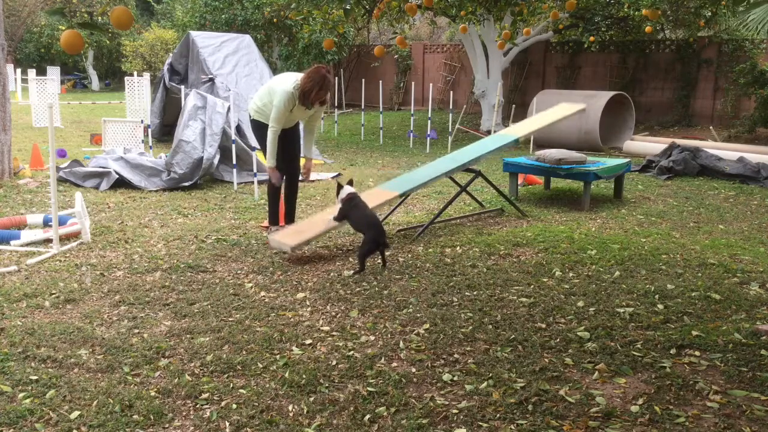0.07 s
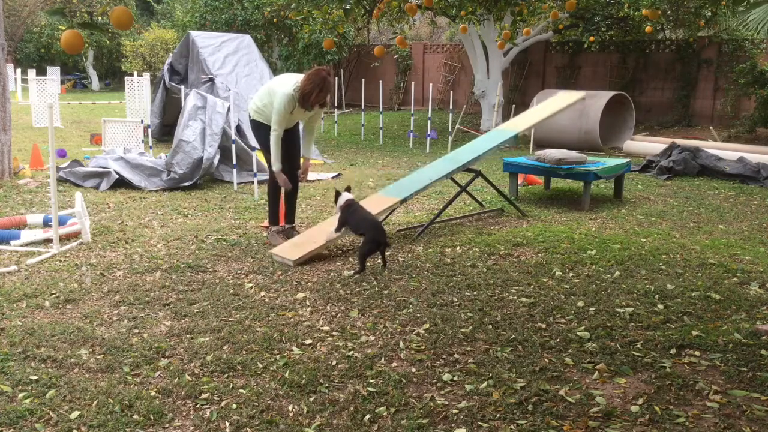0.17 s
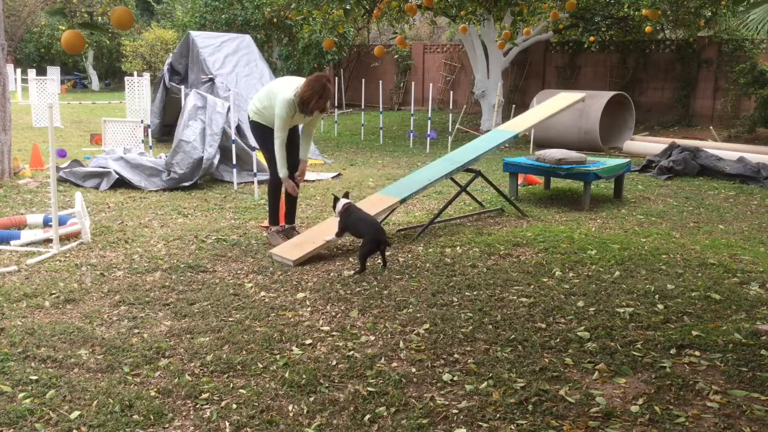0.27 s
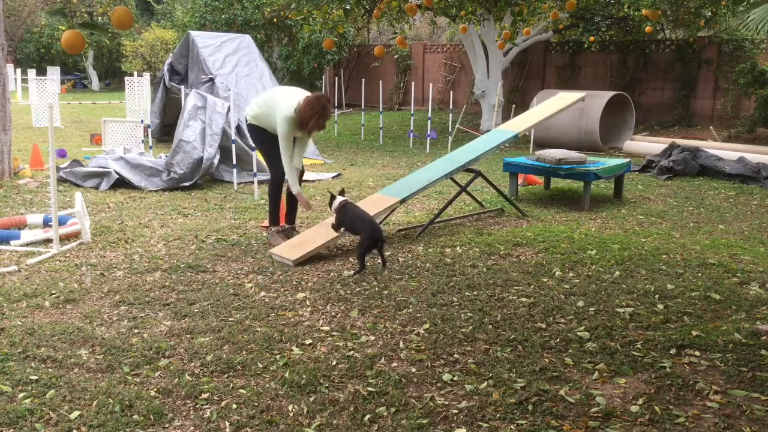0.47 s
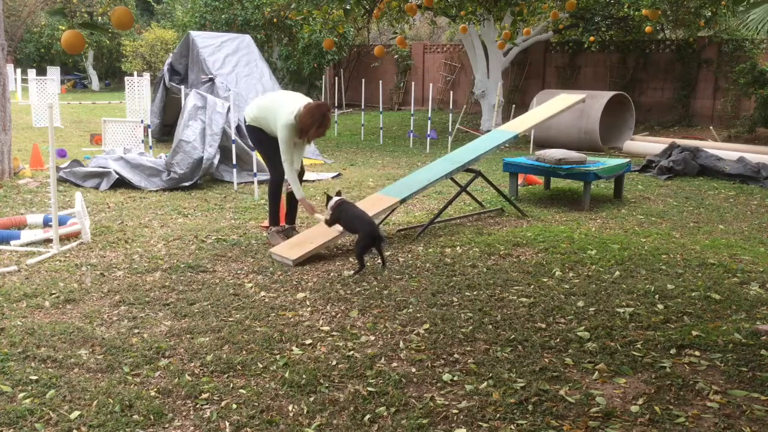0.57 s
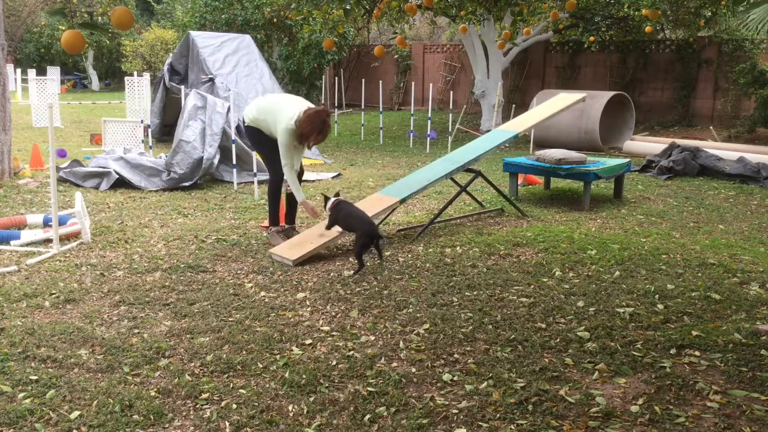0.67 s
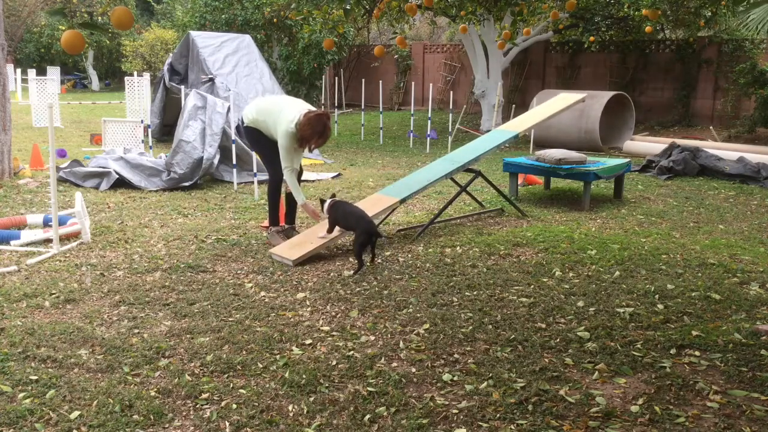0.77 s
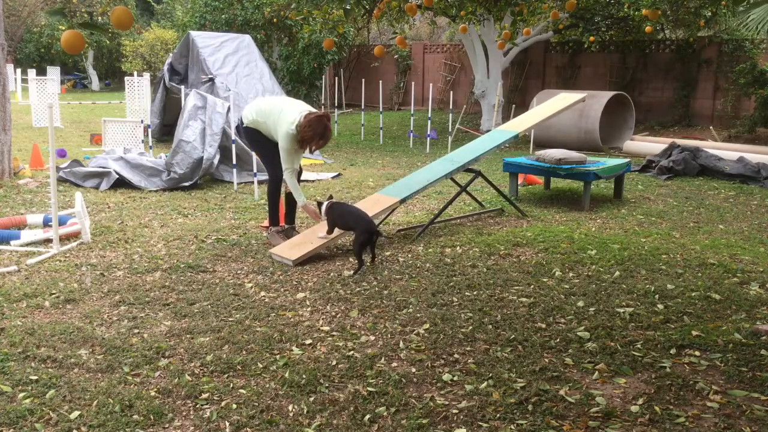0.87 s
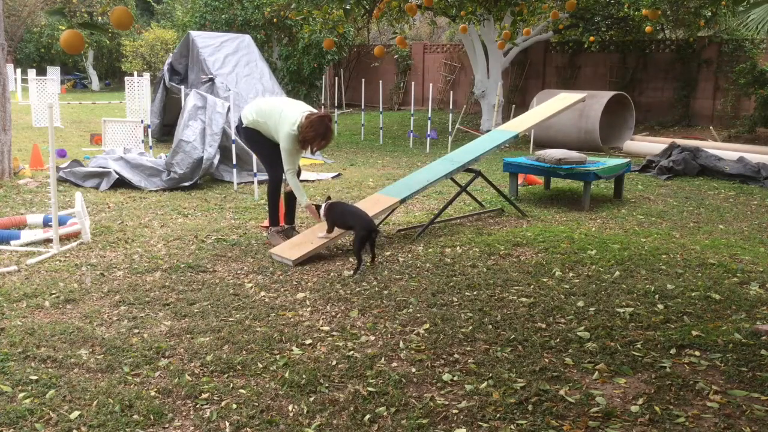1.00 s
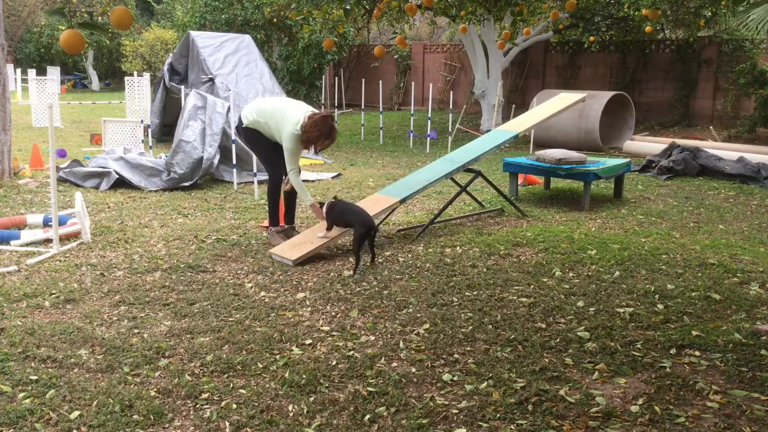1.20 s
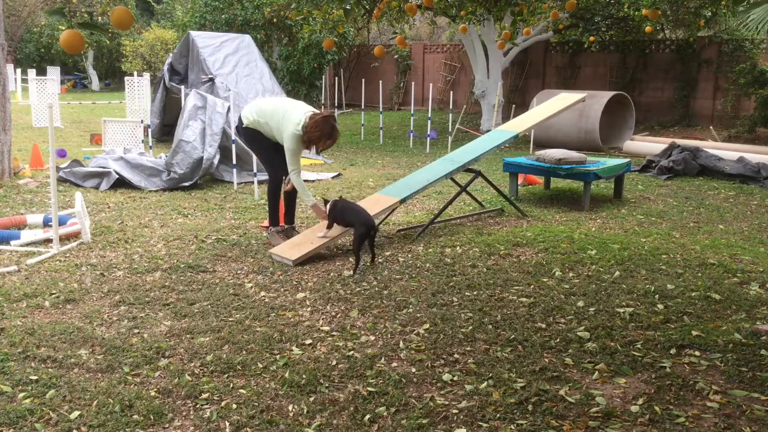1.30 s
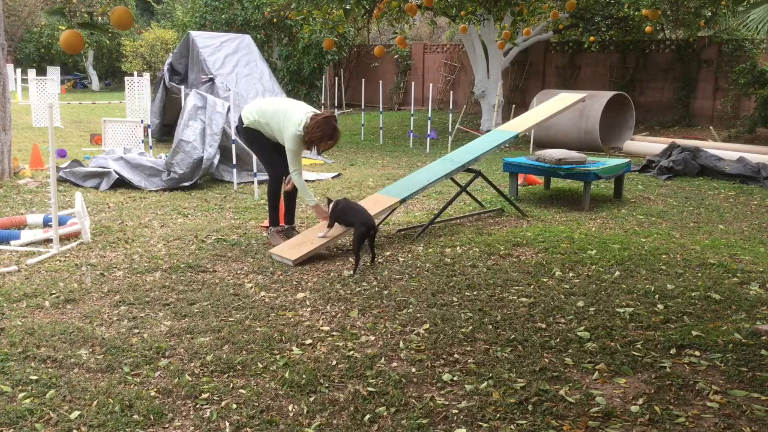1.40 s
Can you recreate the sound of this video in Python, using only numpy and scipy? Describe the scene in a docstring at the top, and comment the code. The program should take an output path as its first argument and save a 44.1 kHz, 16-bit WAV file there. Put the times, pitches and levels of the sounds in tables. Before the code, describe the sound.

A wooden seesaw board drops close by at about 0.2 seconds, a dull thud running straight into a louder, hard clack that echoes briefly around the yard. Small dry clicks, like a dog's claws or leaves, are scattered throughout, clearest near 0.75 seconds. Very faint, distant bird whistles come from about 1.0 to 1.35 seconds. A low rumble of far traffic continues underneath until the end, around 1.5 seconds.

```python
"""Seesaw dropping on a lawn

Near the microphone the end of a wooden seesaw board comes down: two dull thuds, then a hard clack as
the plank slaps its frame. The fence and the yard throw the knock back. Small dry clicks, likely a dog's
claws and fallen leaves, and a few faint, far birds sound over the low rumble of the neighbourhood."""
import sys
import numpy as np
from scipy import signal
from scipy.fft import rfft, irfft
from scipy.io import wavfile

SR = 44100
rng = np.random.default_rng(int(sys.argv[2]) if len(sys.argv) > 2 else 0)


def put_to_file(sound):
    """Save the sound as 16-bit audio at rate SR, in the file named by the first command-line argument."""
    columns = np.atleast_2d(sound).T  # one column per channel
    safe = np.clip(columns, -1, 1)
    whole_steps = np.round(safe * 32767)
    wavfile.write(sys.argv[1], SR, whole_steps.astype(np.int16))


N = 63945
T = np.arange(N) / SR
FREQS = np.fft.rfftfreq(N, 1 / SR)


def amp(db):
    """Decibels to gain."""
    return 10 ** (np.asarray(db) / 20)


def unit(x):
    """Scales to rms 1."""
    return x / np.sqrt(np.mean(x ** 2) + 1e-20)


def curve(points):
    """Joins (frequency, value) points across FREQS on a log-frequency axis."""
    hz, value = np.transpose(points)
    return np.interp(np.log(FREQS + 1), np.log(hz + 1), value)


def delayed(x, s):
    """The sound, starting s seconds later."""
    return np.concatenate([np.zeros(max(round(s * SR), 0)), x])[:N]


def fade(t60, rise_s):
    """Quick rise, then a decay of 60 dB in t60 seconds."""
    return (1 - np.exp(-T / rise_s)) * np.exp(-np.log(1000) * T / t60)


def noise(spectrum, tilt_db=0):
    """Noise of rms 1 with the given spectrum, tilted per octave."""
    gain = amp(curve(spectrum) + tilt_db * np.log2(FREQS + 1))
    return unit(irfft(gain * rfft(rng.choice([-1., 1.], N)), N))


def drift(rate_hz):
    """Random wander of rms 1, mostly slower than rate_hz."""
    return unit(irfft(rfft(rng.standard_normal(N)) * np.exp(-(FREQS / rate_hz) ** 2), N))


def ring(modes, rise_s, sign=-1):
    """Decaying modes after one blow; with sign -1 they alternate in direction."""
    return sum(sign ** k * amp(db) * fade(t60, rise_s) * np.sin(2 * np.pi * hz * T)
               for k, (hz, db, t60) in enumerate(modes))


def tail(spectrum, decays, rise_s):
    """Dense ringing in which each band dies at its own speed."""
    bins = rfft(noise(spectrum))
    centres, t60s = np.transpose(decays)
    bands = [curve(list(zip(centres, weights))) for weights in np.eye(len(decays))]
    return sum(irfft(bins * band, N) * fade(t60, rise_s) for band, t60 in zip(bands, t60s))


def board():
    """Each blow snaps and clacks at the contact, rings the plank, shakes the frame, bends the board."""
    # landings (time [s], lag of the thud [s], thud [dB], plank [dB], clack [dB], snap [dB], rattle [dB])
    blows = [(0.2244, .002, -19.5, -31, -39, -30, -31), (0.2318, .0025, -29, -40.5, -30.5, -29, -35.5),
             (0.2555, .005, -25.5, -26.5, -11, -15, -23.5)]
    # modes of the wood (frequency [Hz], level [dB], t60 [s])
    bending_modes = [(108, -11.5, 0.39), (144.86, -8.5, 0.35), (180, -9.5, 0.29), (232, -0.5, 0.081),
                     (268.3, -4, 0.13), (351.5, -1, 0.082), (415.3, -19.5, .07)]  # low, damped by the ground
    plank_modes = [(690, -8, .11), (754, -2, .19), (945, -7, .11), (1002, -6, .11), (1080, -4, .12),
                   (1130, -4, .15), (1212, -6, .13), (1248, -2, .17), (1335, -8, .13), (1490, -11, .1),
                   (1706, -4, .15), (2050, -9, .1), (2580, -8, .12), (3535, -12, .13)]  # the plank's higher ring
    contact_modes = [(1150, -10, 0.06), (2497, -2.5, .026), (3075, -8, 0.0079), (4600, -7.5, 0.004)]  # short and hard
    # noise spectra (frequency [Hz], level [dB])
    snap_spectrum = [(300, -0.5), (1200, -8), (2000, 2), (2900, 0), (4000, -9), (7000, -11.5),
                     (11000, -18.5), (15000, -34.5)]  # splintery contact
    rattle_spectrum = [(60, -23.5), (150, 2), (350, 3), (560, 0.5), (1100, 3.5), (1800, -4), (2700, -7.5),
                       (3800, -10.5), (4700, -17.5), (8000, -15.5), (12500, -19), (15000, -31)]  # crowded modes of board and frame
    # decay of those crowded modes (frequency [Hz], t60 [s])
    rattle_decay = [(130, .4), (350, .17), (1000, 0.1), (3000, 0.28), (10000, 0.22)]
    low_cut = signal.butter(1, 70, "high", fs=SR)  # a gentle cut keeps the thud free of the deepest bass
    thud = signal.lfilter(*low_cut, ring(bending_modes, rise_s=.00092, sign=1))
    plank = ring(plank_modes, rise_s=.001)
    clack = ring(contact_modes, rise_s=.0003)
    body, clacks = np.zeros((2, N))
    for s, lag, thud_db, plank_db, clack_db, snap_db, rattle_db in blows:
        snap = amp(snap_db) * noise(snap_spectrum) * fade(t60=.028, rise_s=.0003)
        rattle = amp(rattle_db) * tail(rattle_spectrum, rattle_decay, rise_s=.001)
        body += delayed(amp(thud_db) * delayed(thud, lag) + amp(plank_db) * plank + snap + rattle, s)
        clacks += delayed(amp(clack_db) * clack, s)
    return body, clacks


def clicks():
    """Sharp ticks with a short ring, each followed by its scatter from the things around."""
    # dry ticks (time [s], level [dB], tilt [dB/octave], relative scatter [dB], relative ring [dB])
    ticks = [(.003, -58.5, -4, -2.5, -3), (.1275, -51.5, 0, -9, -30), (.189, -45, -1.5, -2.5, -10),
             (.199, -43.5, -16, -3.5, -17), (0.6062, -56.5, -2, -17, -24),
             (0.693, -52.5, -6.5, -4.5, -11.5), (0.737, -30, -1, -14.5, -20), (0.7637, -35.5, -1, -12, -15),
             (.8335, -46.5, 11, -12, -10), (0.8723, -49, -1.5, -19.5, -10.5), (1.0061, -48, -6, -10.5, -5),
             (1.026, -50, -13, -16.5, -14), (1.4348, -50.5, -1, -16.5, -11.5),
             (1.446, -50, -6.5, -17, -9.5)]
    # colour of tick and scatter (frequency [Hz], level [dB])
    spectrum = [(600, -33.5), (1700, -16), (2700, -4.5), (3700, 0), (5200, -2.5), (7500, -1.5), (11000, -6),
                (13500, -14), (15000, -25.5)]
    # ring of a tick (frequency [Hz], level [dB], t60 [s])
    modes = [(2770, -5.5, 0.031), (3300, -7, 0.041), (4050, -4.5, 0.033)]
    tick, scatter = fade(t60=.0084, rise_s=.0004), fade(t60=.17, rise_s=.005)
    tone = ring(modes, rise_s=.0004)
    out = np.zeros(N)
    for s, db, tilt, scatter_db, ring_db in ticks:
        burst = (tick + amp(scatter_db) * scatter) * noise(spectrum, tilt)
        out += delayed(amp(db) * (burst + amp(ring_db) * tone), s)
    return out


def bird_whistles():
    """Thin whistles, far from the microphone, that glide and waver."""
    # bird notes (time [s], length [s], start pitch [Hz], end pitch [Hz], level [dB])
    notes = [(1.035, 0.1, 3710, 3800, -83.5), (1.04, 0.16, 3030, 3060, -79.5),
             (1.09, 0.052, 2260, 2460, -80), (1.182, 0.063, 3067, 3040, -79.5),
             (1.279, 0.072, 3580, 3880, -87), (1.315, 0.032, 2548, 2470, -74.5)]
    waver, edge_s, flutter_db = .008, .012, 3.5
    out = np.zeros(N)
    for s, length, start_hz, end_hz, db in notes:
        hz = np.interp(T, [0, length], [start_hz, end_hz]) * (1 + waver * drift(150))
        gate = np.clip(np.minimum(T, length - T) / edge_s, 0, 1)
        level = gate * amp(db + flutter_db * drift(50))
        out += delayed(level * np.sqrt(2) * np.sin(2 * np.pi * np.cumsum(hz) / SR), s)
    return out


def bird_chips(pitch_hz=12000):
    """Tiny, very high chips: a fading tone made fuzzy by a fast flicker."""
    # bird calls (time [s], level [dB])
    calls = [(.027, -67), (0.9125, -63)]
    tone = np.sqrt(2) * np.sin(2 * np.pi * pitch_hz * T) * fade(t60=.13, rise_s=.0052)
    return sum(delayed(amp(db) * tone * drift(rate_hz=124), s) for s, db in calls)


def echoes(x):
    """Smeared reflections; the farther they travel, the duller they reach the microphone."""
    # returns from tunnel, fence and the houses behind (delay [s], level [dB], t60 of the smear [s])
    reflections = [(.0105, -16, 0.016), (.021, -21, 0.09), (0.052, -19.5, 0.08), (.063, -17, 0.031),
                   (.13, -41.5, .15), (.205, -38, 0.25), (.245, -43.5, 0.083), (0.286, -46.5, 0.027)]
    # colour of the returns (frequency [Hz], level [dB])
    colour = [(60, -8), (130, 0), (320, -3.5), (700, 1), (1900, -3), (2600, 1), (3700, -0.5), (5000, -5.5),
              (12000, -7)]
    knee_hz, dulling_db = 3000, 22  # loss per octave above the knee, per second of travel
    octaves = np.log2(np.maximum(FREQS / knee_hz, 1))
    response = np.zeros(N)
    for s, db, t60 in reflections:
        smear = noise(colour) * fade(t60, rise_s=.0003)
        echo = delayed(amp(db) * smear / np.linalg.norm(smear), s)
        response += irfft(rfft(echo) * amp(-dulling_db * s * octaves), N)
    return signal.fftconvolve(x, response)[:N]


def yard(x, level_db=-24.5):
    """The weak late wash of the open yard."""
    # colour of the wash (frequency [Hz], level [dB])
    spectrum = [(100, -4.5), (270, -2), (600, -6.5), (2000, -1), (2600, -8), (3600, -6), (5500, -1.5),
                (12000, -13.5)]
    # its decay (frequency [Hz], t60 [s])
    decay = [(100, 0.34), (1000, 0.52), (2500, 0.68), (5000, .42), (12000, .4)]
    response = tail(spectrum, decay, rise_s=.04)
    return amp(level_db) * signal.fftconvolve(x, response / np.linalg.norm(response))[:N]


def neighbourhood(rumble_db=-44.5, wander_hz=1.4):
    """Far traffic, whose roar swells slowly over its rumble, and a faint wavering hum."""
    # traffic rumble and outdoor air (frequency [Hz], level [dB])
    spectrum = [(20, -32.5), (35, -22), (52, -6.5), (74, 1), (95, -2.5), (125, -2), (180, -10.5),
                (280, -18), (470, -24), (680, -20), (1100, -27), (1700, -41), (2800, -48.5), (4600, -60),
                (12500, -63), (14000, -60), (15500, -82.5)]
    # distant machinery (frequency [Hz], level [dB])
    hum_tones = [(75, -59), (656, -65)]
    # swell of the roar (time [s], gain [dB])
    swell = [(0, -0.5), (.2, -2), (.6, 1.5), (1.2, -1), (1.45, 0.4)]
    hum = np.zeros(N)
    for hz, db in hum_tones:
        phase = 2 * np.pi * np.cumsum(hz + wander_hz * drift(2.7)) / SR
        hum += amp(db) * np.sqrt(2) * np.sin(phase)
    air = amp(rumble_db) * noise(spectrum) + hum
    roar = irfft(rfft(air) * ((FREQS > 350) & (FREQS < 2500)), N)
    return air - roar + roar * amp(np.interp(T, *np.transpose(swell)))


def scene():
    """The board and the small sounds, heard from one microphone in the open yard."""
    body, clacks = board()
    small = clicks() + bird_whistles() + bird_chips()
    spill = body + amp(-11) * clacks  # only part of the clack reaches the surroundings
    return (body + clacks + small + echoes(spill) + yard(spill + small) + neighbourhood())[None]


def record(dry):
    """The recorder's band limit cuts the highest treble."""
    low_pass = signal.firwin(301, cutoff=15450, window=("kaiser", 9), fs=SR)
    return signal.oaconvolve(dry, low_pass[None], "same")


dry = scene()
out = record(dry)
put_to_file(out)
```